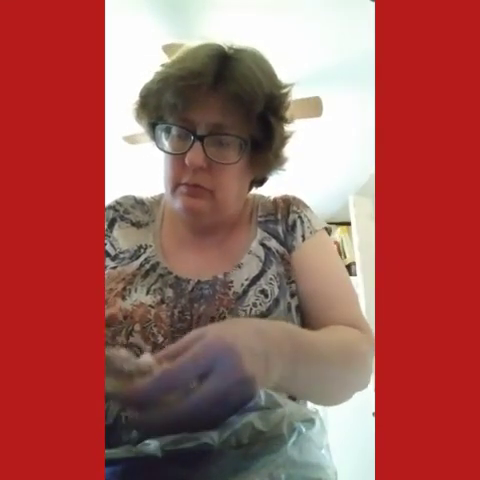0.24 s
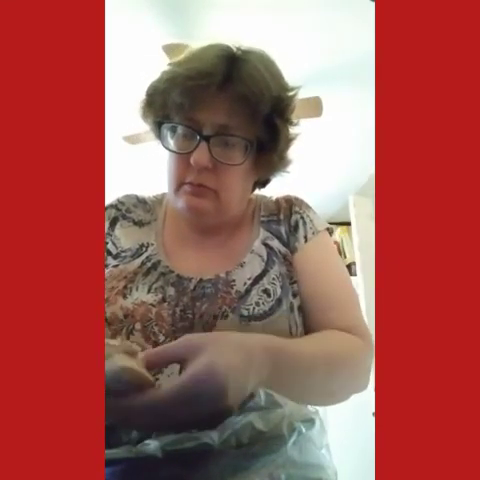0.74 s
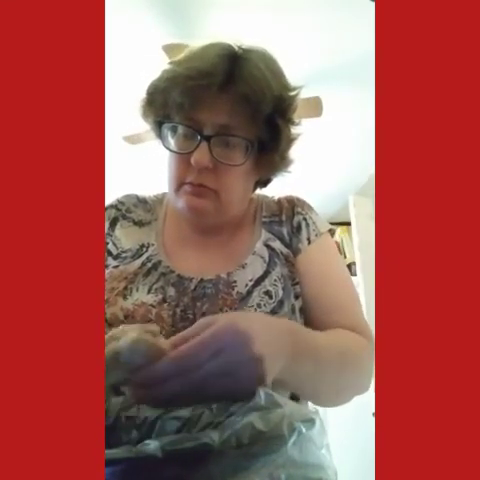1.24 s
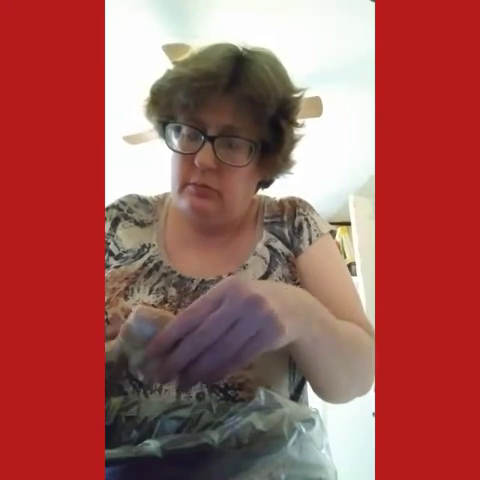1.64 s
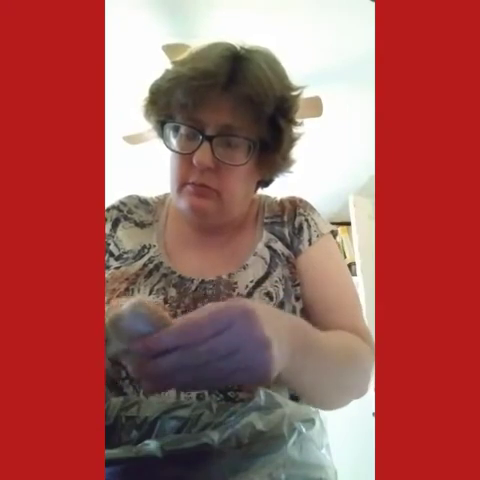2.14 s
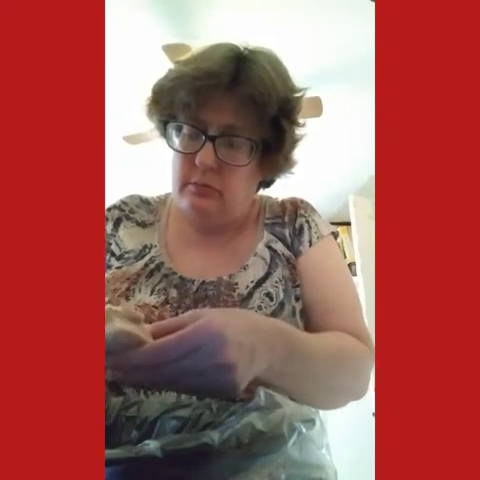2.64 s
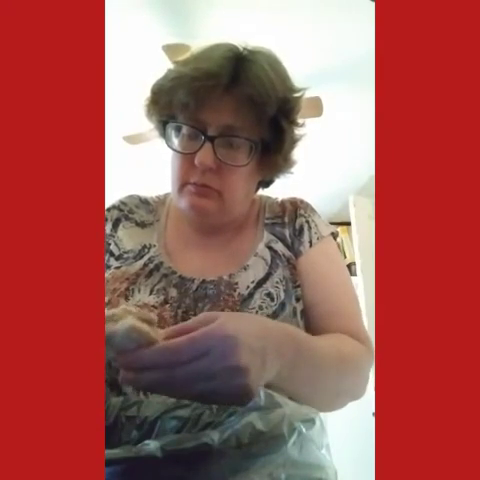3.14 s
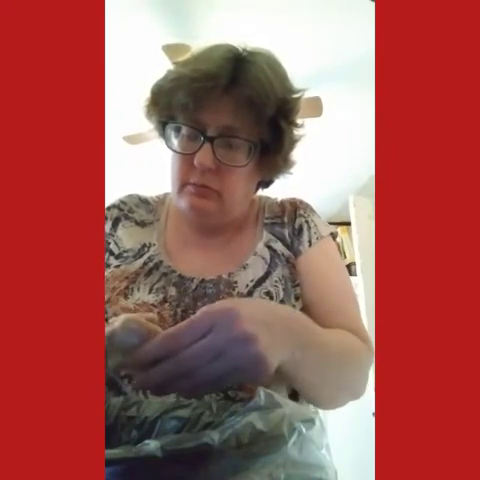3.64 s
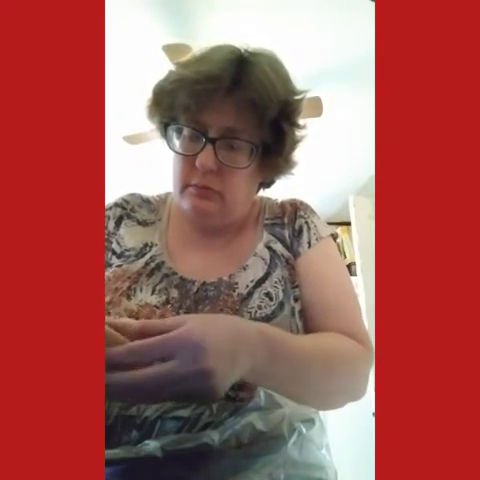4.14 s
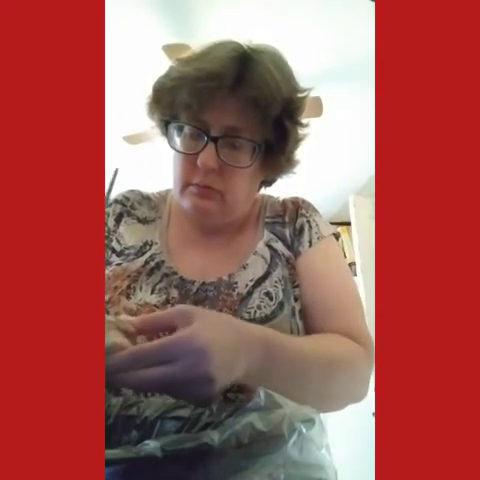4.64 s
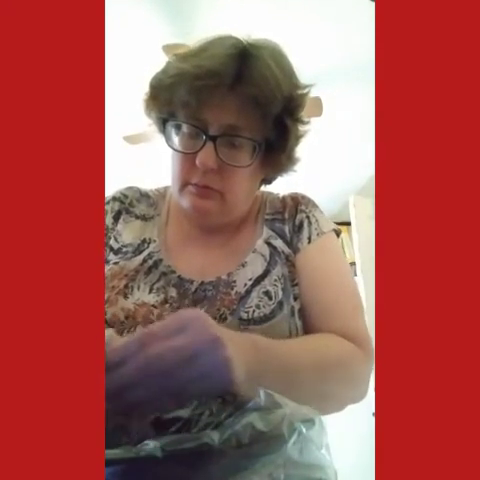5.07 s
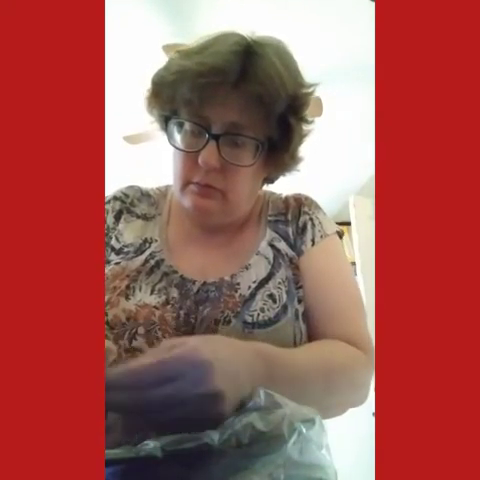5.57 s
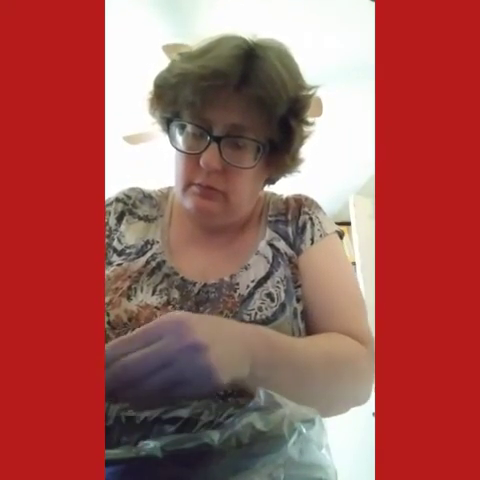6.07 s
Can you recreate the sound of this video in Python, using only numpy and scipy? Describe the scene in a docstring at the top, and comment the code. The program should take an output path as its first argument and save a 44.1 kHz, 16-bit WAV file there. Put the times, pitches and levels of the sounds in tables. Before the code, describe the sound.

Scissors snip through cooked meat over a crinkling plastic liner, with one sharp clack of the blades and a faint appliance hum.

```python
"""Scissors cut cooked meat over a thin plastic liner while a kitchen appliance hums throughout.
First the film rustles and snaps as its creases buckle, pieces pat down, and fibres tear in short cuts.
Near 2 s the blades touch lightly; at 3.6 s they clack and ring, and a dense run of cuts and snaps follows.
More cuts lead to the sharpest snap at 5.6 s, after which the film rustles on under the hands."""
import sys
import numpy as np
from scipy import signal
from scipy.fft import rfft, irfft
from scipy.io import wavfile
from scipy.ndimage import uniform_filter1d

SR = 44100
rng = np.random.default_rng(int(sys.argv[2]) if len(sys.argv) > 2 else 0)


def materialize(psi):
    """Save the field psi as 16-bit PCM at rate SR to the path in sys.argv[1].

    A 1-D psi becomes a single channel; in a 2-D psi each row is a channel.
    """
    bounded = np.clip(np.atleast_2d(psi).T, -1, 1)
    quanta = np.round(bounded * 32767).astype(np.int16)
    wavfile.write(sys.argv[1], SR, quanta)


N = 278000


def gain_of(db):
    """Amplitude ratio of a level in decibels."""
    return 10 ** (np.asarray(db) / 20)

def unit_rms(x):
    """Normalisation to an rms of 1."""
    return x / np.sqrt(np.mean(x ** 2) + 1e-20)

def curve_at(points, hz):
    """Interpolation on a logarithmic frequency axis."""
    f, value = np.transpose(points)
    return np.interp(np.log(hz + 1), np.log(f + 1), value)

def add(mix, start, sound):
    """Superposition: a sound joins the mix at a start time in seconds."""
    part = mix[round(start * SR):][:len(sound)]
    part += sound[:len(part)]

def resonate(x, hz, width):
    """Forced response of one damped mode, its bandwidth in Hz."""
    phasor = np.exp(2j * np.pi * hz * np.arange(len(x)) / SR)
    pole = np.exp(-np.pi * width / SR)
    return 2 * (phasor * signal.lfilter([1 - pole], [1, -pole], x / phasor)).real

def coloured(x, spectrum):
    """Minimum-phase filtering imposes a spectrum causally."""
    db = curve_at(spectrum, abs(np.fft.fftfreq(4096, 1 / SR)))
    log_gain = np.log(gain_of(np.maximum(db, -80)))
    taps = np.fft.ifft(np.exp(np.conj(signal.hilbert(log_gain)))).real[:1024]
    return signal.oaconvolve(x, taps / np.linalg.norm(taps))[:len(x)]

def split(x, hz):
    """A crossover: the parts above and below a frequency."""
    return [signal.sosfilt(signal.butter(3, hz, kind, fs=SR, output="sos"), x) for kind in ("high", "low")]

def cracks(per_s, spread_db, spectrum, count):
    """Shot noise: random impulses of uneven size, swelling in clumps."""
    clumps = unit_rms(uniform_filter1d(uniform_filter1d(rng.standard_normal(count), 150), 150))
    size = gain_of(spread_db * np.minimum(rng.exponential(1, count), 4) + 1.04 * clumps)
    impulses = size * rng.standard_normal(count) * (rng.random(count) < per_s / SR)
    return coloured(impulses, spectrum)


# Absorption in the room. Each row: frequency in Hz, time to decay by 60 dB in seconds.
ROOM_DECAY = [(500, 0.74), (3000, 0.22), (9000, 0.15), (16000, 0.18)]

def kitchen_reverb(x):
    """Reverberation: sparse reflections of random sign, each band decaying at its own rate."""
    reflections = np.zeros(SR // 2)
    slots = np.arange(120, SR // 2 - 20, 20)
    reflections[slots + rng.integers(0, 20, len(slots))] = rng.choice([-1., 1.], len(slots))
    hz, t, bands = signal.stft(reflections, SR, nperseg=256)
    decay = gain_of(-60 * t / curve_at(ROOM_DECAY, hz)[:, None])
    tail = signal.istft(bands * decay, SR, nperseg=256)[1]
    return signal.fftconvolve(x, tail / np.linalg.norm(tail))[:N]


# Air noise of the fan. Each row: frequency in Hz, relative spectral density in dB.
FAN_SPECTRUM = [(30, -35), (80, -39), (141, -23), (239, -5.5), (437, 0.5), (499, -3.5), (649, 0),
                (937, -5.5), (2170, -11), (2750, -12), (3580, -29), (4650, -16), (6900, -37), (16000, -20)]
# Tones of the appliance. Each row: frequency in Hz, rms level in dB, bandwidth in Hz.
HUM_TONES = [(237.8, -69.5, 6.5), (286.5, -70, 27), (354.7, -73.5, 10), (406, -74.5, 6.1),
             (442.4, -71.5, 17), (644.6, -70.5, 1.9), (763, -68, 58), (2785, -72.5, 190)]

def appliance():
    """Forced vibration over broadband fan noise: narrow motor tones and broader housing resonances."""
    fan_colour = gain_of(curve_at(FAN_SPECTRUM, np.fft.rfftfreq(N, 1 / SR)))
    out = gain_of(-63.5) * unit_rms(irfft(rfft(rng.standard_normal(N)) * fan_colour, N))
    for hz, db, width in HUM_TONES:
        waver = unit_rms(resonate(rng.standard_normal(N), hz, width))
        steady = np.sqrt(2) * np.sin(2 * np.pi * (hz * np.arange(N) / SR + rng.random()))
        out += gain_of(db) * unit_rms(waver + 13.2 / width * steady)
    return out


# Film sliding under the hands. Each row: time in seconds, level in dB.
RUSTLE_LEVELS = [(0, -39), (0.05, -67), (.36, -59), (.6, -53.5), (1.08, -56), (1.17, -72), (1.47, -69.5),
                 (1.98, -58), (2.1, -65), (2.5, -54.5), (2.8, -62), (3.39, -67.5), (3.74, -49),
                 (3.91, -48.5), (4.24, -64.5), (4.5, -53.5), (4.8, -56.5), (5.01, -62), (5.1, -53),
                 (5.44, -65), (5.69, -52), (5.88, -70), (6.1, -62.5), (6.3, -59.5)]
# Colour of the sliding. Each row: frequency in Hz, relative spectral density in dB.
RUSTLE_SPECTRUM = [(1200, -9.5), (2200, -10.5), (3600, -6), (4700, -1), (7000, -2), (9000, -9.5),
                   (12000, -16), (16000, -40)]

def rustle():
    """Friction noise: thousands of tiny cracks a second merge as the film slides."""
    db = np.interp(np.arange(N) / SR, *np.transpose(RUSTLE_LEVELS))
    return gain_of(db) * unit_rms(cracks(per_s=5000, spread_db=0.57, spectrum=RUSTLE_SPECTRUM, count=N))


# Pats of meat and handles. Each row: start in seconds, level in dB, resonance in Hz,
# time to decay by 60 dB in seconds.
SOFT_IMPACTS = [(.13, -51.5, 620, 0.27), (.345, -42, 645, 0.044), (.543, -52, 800, .06),
                (0.715, -30.5, 750, 0.05), (1.506, -60, 131, .06), (2.25, -48.5, 710, .05),
                (3.751, -54, 141, 0.081), (5.573, -50, 130, 0.038), (5.589, -44.5, 503, 0.17)]

def pats():
    """Damped impact: a soft contact drives a broad, low resonance with a puff of noise."""
    t, out = np.arange(4000) / SR, np.zeros(N)
    attack = 1 - np.exp(-t / 0.0019)
    for start, db, hz, t60 in SOFT_IMPACTS:
        drive = rng.standard_normal(len(t))
        puff = unit_rms(resonate(resonate(drive, hz, width=hz), hz, width=hz))
        add(out, start, gain_of(db - 60 * t / t60) * attack * puff)
    return split(out, 110)[0]  # the microphone's bass cut thins the pats below 110 Hz


def faint_snaps(count=70, lowest_hz=3230, highest_hz=7300):
    """A random point process: rows of small snaps whose levels follow the rustle."""
    when, size, patch = rng.random((count, 3)).T
    starts = when * N / SR
    db = np.interp(starts, *np.transpose(RUSTLE_LEVELS)) + 0.5 - 3.5 * np.log(size)
    hz = lowest_hz * (highest_hz / lowest_hz) ** patch
    low_db = np.full(count, -7.5)
    return list(zip(starts, db, hz, low_db))


SLACK_HZ, TIGHT_HZ = 3000, 9000  # large slack creases sound below the first, tight ones above the second
# The clearer snaps of creases. Each row: start in seconds, peak short-term level in dB,
# resonance of the film patch in Hz, relative level below SLACK_HZ in dB.
CREASE_SNAPS = [(0.118, -40, 6370, -20), (0.1299, -35.5, 6160, -12), (0.139, -36.5, 4650, -16),
                (0.1526, -38, 6710, -13), (0.171, -42, 4300, -12), (0.2143, -37.5, 5000, -10),
                (0.2248, -37, 5200, -6.5), (0.3107, -45, 4230, -1.5), (0.387, -43.5, 3300, -8),
                (0.418, -51.5, 3270, -7), (0.5442, -36.5, 4780, 2), (0.624, -45, 4540, -8),
                (0.648, -50, 4710, -14), (0.6817, -37, 6640, -4), (0.6963, -27, 6160, -32),
                (0.71, -28.5, 6440, -11.5), (0.7512, -38.5, 4770, -4), (0.8252, -43.5, 5170, -8),
                (0.8347, -39.5, 4530, -4.5), (0.8774, -47, 4250, -8), (0.9246, -33.5, 7600, -12),
                (0.9686, -48, 3680, -4), (0.988, -43, 4500, -6), (0.9993, -34, 5800, -10.5),
                (1.054, -32, 7700, -9.5), (1.0712, -37.5, 7270, -7), (1.4935, -50.5, 6960, -9),
                (1.513, -48.5, 5170, -8), (1.5316, -51.5, 3400, -4), (1.7606, -33, 5200, -7),
                (1.8045, -42, 4700, -12), (1.8982, -37.5, 6750, -2.5), (1.932, -31, 6660, -10.5),
                (2.1226, -47.5, 4750, -5), (2.1934, -45.5, 5410, -1), (2.2323, -41.5, 7000, -2.5),
                (2.372, -41.5, 3220, -7), (2.4136, -41.5, 7200, -9), (2.4413, -43, 4050, -5.5),
                (2.541, -41, 3600, -9), (2.574, -31.5, 5800, -2.5), (2.6214, -42, 5500, -24),
                (3.2913, -50, 4520, -28), (3.412, -50, 4660, -7), (3.4523, -43.5, 5700, -4.5),
                (3.5245, -44.5, 5300, -15), (3.69, -37.5, 3170, -9), (3.7549, -29.5, 3800, -7),
                (3.7884, -40, 5050, -2), (3.8146, -32, 4520, -2.5), (3.824, -24.5, 4960, -11),
                (3.8513, -32, 4460, -22), (3.871, -24, 4800, -14), (3.8805, -27, 4540, -8),
                (3.8991, -30.5, 4460, -11), (3.933, -34, 5050, 0), (3.9462, -27.5, 4830, -8.5),
                (3.959, -30, 4260, -15), (3.9906, -24.5, 4560, -15.5), (4.0012, -23.5, 4760, -11.5),
                (4.088, -46, 4160, -13), (4.1088, -42, 4860, -4.5), (4.154, -45, 3760, -9),
                (4.319, -50.5, 3060, -12), (4.418, -42.5, 6150, -31), (4.793, -36.5, 4700, -26),
                (4.9427, -44.5, 5600, -17), (5.03, -42, 6250, -32), (5.156, -33, 4000, -7),
                (5.2828, -34, 4300, -9.5), (5.322, -46.5, 2680, 2), (5.336, -37, 2980, -5),
                (5.385, -46.5, 6350, -24), (5.5276, -46.5, 2740, -12), (5.55, -49, 4900, -6),
                (5.6045, -19.5, 5260, -15), (5.651, -33, 4930, -19), (5.725, -41, 6490, -8),
                (5.8256, -43.5, 3670, -19), (6.095, -49, 4420, -16), (6.172, -52, 6740, -24)]
# Colour of a crack. Each row: frequency in Hz, relative spectral density in dB.
CRACK_SPECTRUM = [(250, -25), (500, -19.5), (1000, -17), (1350, -22.5), (1550, -8.5), (2200, -13),
                  (3500, -4.5), (5000, -2), (7700, -6), (11000, -20.5), (16000, -28.5)]
# Drifting brightness of the snaps. Each row: time in seconds, relative level above TIGHT_HZ in dB.
SNAP_BRIGHTNESS = [(0.1, -31), (0.22, -10), (1.8, -18.5), (2.6, -12), (3.55, -9), (3.7, -32), (4.3, -25),
                   (4.45, -5), (5.2, -18), (6.2, -7.5)]

def snaps():
    """Buckling: a crease gives way in a run of uneven cracks, and one patch of film resonates."""
    t, out = np.arange(2000) / SR, np.zeros(N)
    envelope = (1 - np.exp(-t / 0.0012)) * gain_of(-60 * t / 0.037)
    for start, db, hz, low_db in faint_snaps() + CREASE_SNAPS:
        noise, spikes = rng.standard_normal((2, len(t)))
        high, low = split(coloured(noise * gain_of(3.5 * spikes), CRACK_SPECTRUM), SLACK_HZ)
        top, middle = split(high, TIGHT_HZ)
        patch = unit_rms(resonate(middle, hz, width=0.19 * hz))
        body = unit_rms(unit_rms(middle) + 1.44 * patch)
        top_db = np.interp(start, *np.transpose(SNAP_BRIGHTNESS))
        burst = envelope * (body + gain_of(low_db) * unit_rms(low) + gain_of(top_db) * unit_rms(top))
        peak_rms = np.sqrt(uniform_filter1d(burst ** 2, 90).max())  # over 2 ms
        add(out, start, gain_of(db) * burst / peak_rms)
    return out


# Blades shearing meat. Each row: time of the peak in seconds, decay constant in seconds, level in dB.
CUTS = [(.145, 0.071, -45), (.70, 0.07, -42.5), (1.766, 0.062, -50), (1.93, 0.047, -50.5),
        (2.099, 0.022, -52), (2.588, 0.028, -46.5), (3.835, 0.028, -34.5), (3.885, 0.019, -33),
        (3.955, 0.03, -40), (4.01, 0.04, -39.5), (4.801, 0.075, -42), (4.86, 0.023, -40.5),
        (5.199, 0.032, -43), (5.351, 0.039, -49.5), (5.596, 0.024, -30), (5.643, 0.015, -37.5)]

def cuts(rise_s=0.021, low_db=-7):
    """Shear fracture: fibres tear in a wet crunch that swells as the blades close, then dies away."""
    t, out = np.arange(-6000, 9000) / SR, np.zeros(N)
    for peak_time, decay_s, db in CUTS:
        tearing = cracks(per_s=5000, spread_db=0.56, spectrum=CRACK_SPECTRUM, count=len(t))
        high, low = split(tearing, SLACK_HZ)
        crunch = unit_rms(high) + gain_of(low_db) * unit_rms(low)
        envelope = np.exp(-np.where(t < 0, (t / rise_s) ** 2, t / decay_s))
        add(out, peak_time + t[0], gain_of(db) * envelope * crunch)
    return out


# Blades meeting. Each row: start in seconds, level in dB, scrape length in seconds,
# offset in dB for all modes but the main one.
BLADE_CONTACTS = [(1.611, -57.5, 0.03, -5), (1.897, -45.5, 0.0089, -15), (1.933, -53.5, 0.0063, 7),
                  (2.074, -51, 0.013, -7), (3.58, -24.5, 0.01, -3.5)]
# Mode clusters of the blades. Each row: frequency in Hz, bandwidth in Hz, relative level in dB,
# decay constant of the rattle in seconds.
BLADE_MODES = [(1735, 210, -12, 0.0058), (2920, 670, -3, 0.035), (4490, 1150, 0, 0.0092),
               (6800, 1600, 2.5, 0.03), (8000, 2300, -8, 0.025), (10900, 3300, -15, 0.017)]

def clacks(main_mode_hz=6800):
    """Modal vibration: a short scrape of steel on steel excites the blades, which rattle as they decay."""
    t, out = np.arange(6000) / SR, np.zeros(N)
    attack = np.minimum(t / 0.0072, 1)
    for start, db, scrape_s, offset_db in BLADE_CONTACTS:
        drive = rng.standard_normal(len(t))
        scrape = np.exp(-(t / scrape_s) ** 2)
        for hz, width, mode_db, rattle_s in BLADE_MODES:
            envelope = attack * (scrape + 0.49 * np.exp(-t / rattle_s))
            ring = unit_rms(resonate(resonate(drive, hz, width), hz, width))
            level_db = db + mode_db + offset_db * (hz != main_mode_hz)
            add(out, start, gain_of(level_db) * envelope * ring)
    return out


def scene():
    """Direct and reverberant sound superpose at one close microphone, alike in both channels."""
    crisp = snaps() + cuts() + clacks() + rustle()
    crisp = split(crisp, 253)[0]  # thin things radiate no bass
    soft = pats()
    mono = crisp + soft + kitchen_reverb(gain_of(-8) * crisp + soft / 6) + appliance()
    return np.array([mono, mono])

def record(dry):
    """Band limiting: a linear-phase low-pass filter cuts off at 15850 Hz."""
    lowpass = signal.firwin(511, 15850, window=("kaiser", 9), fs=SR)
    return signal.oaconvolve(dry, lowpass[None], "same")


dry = scene()
out = record(dry)
materialize(out)
```